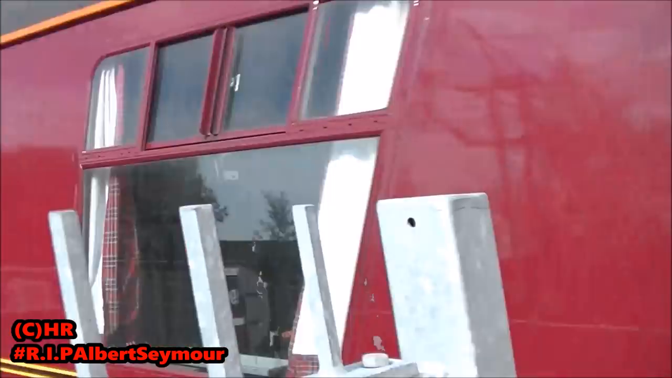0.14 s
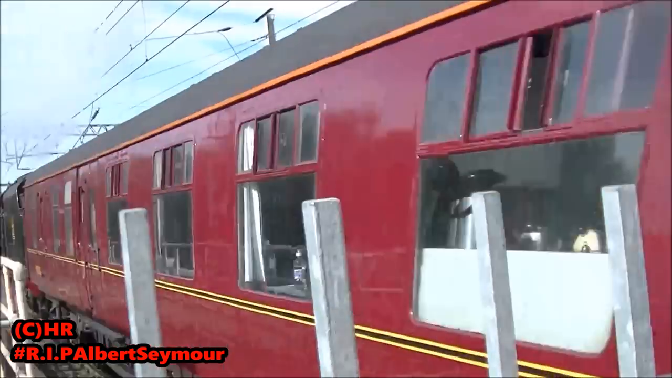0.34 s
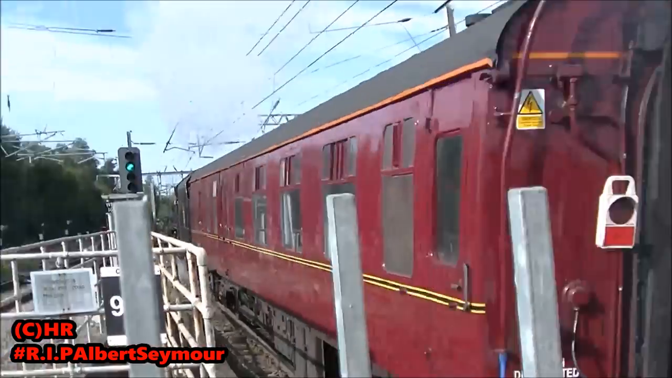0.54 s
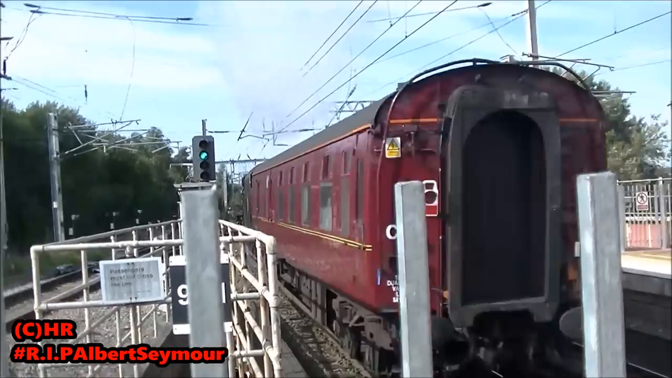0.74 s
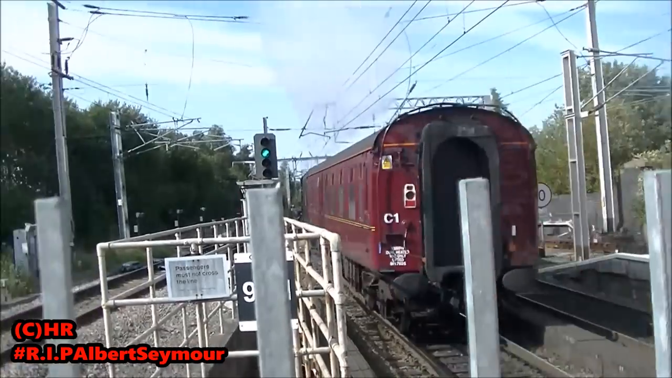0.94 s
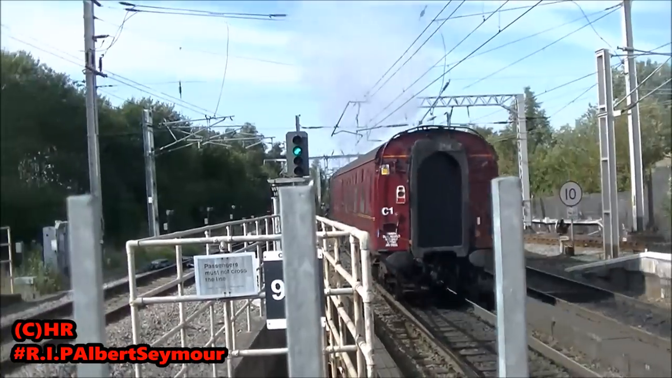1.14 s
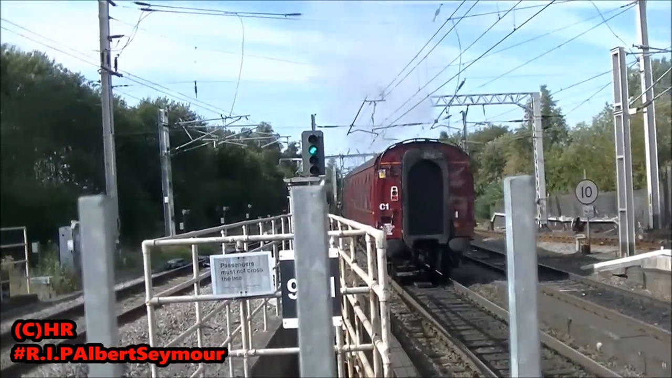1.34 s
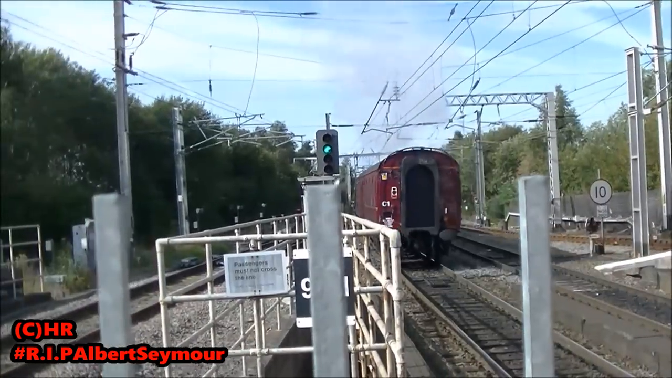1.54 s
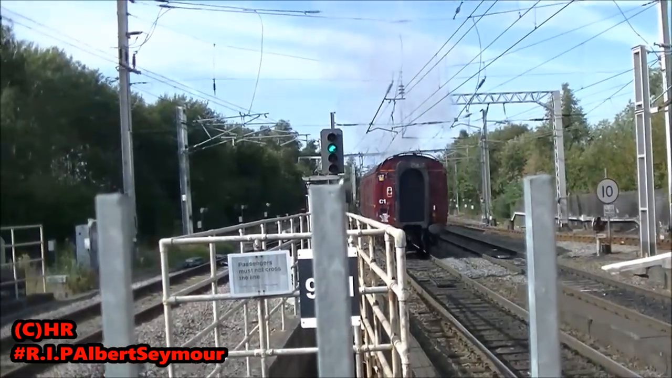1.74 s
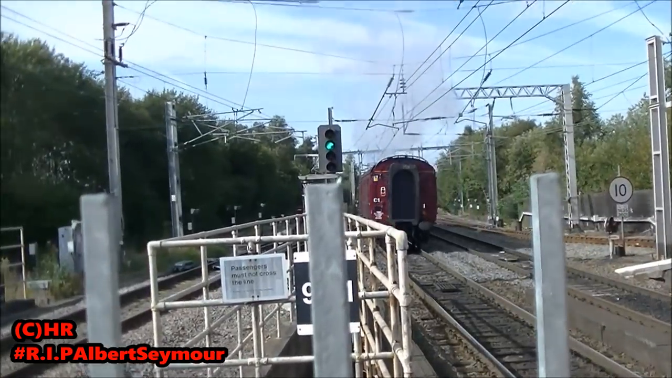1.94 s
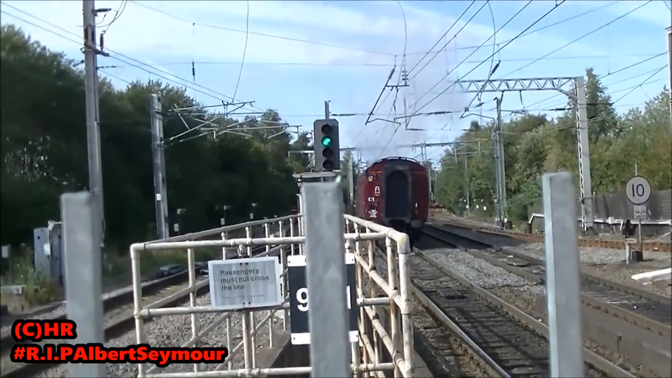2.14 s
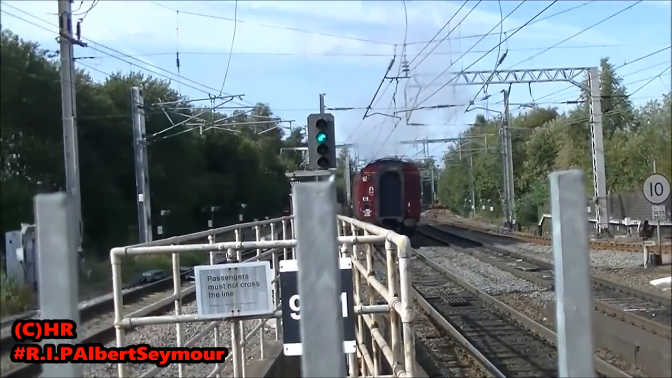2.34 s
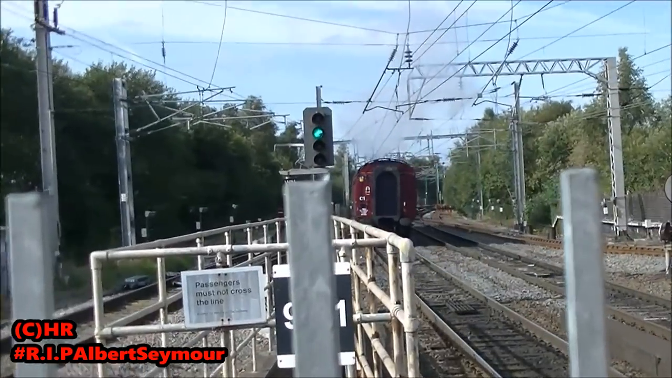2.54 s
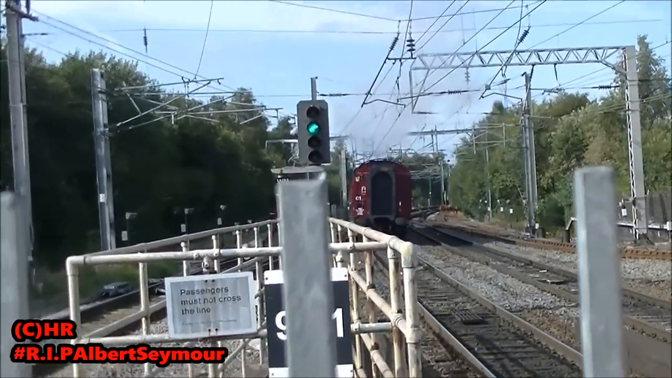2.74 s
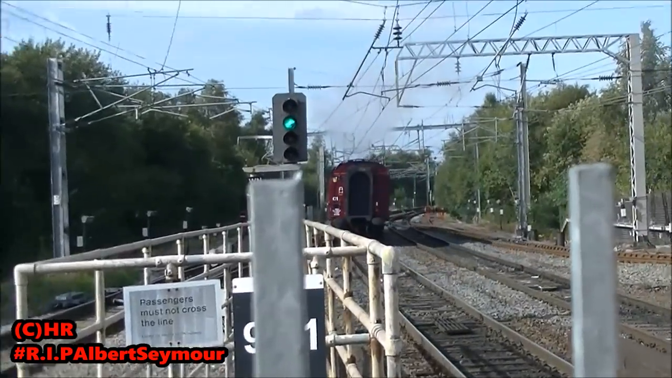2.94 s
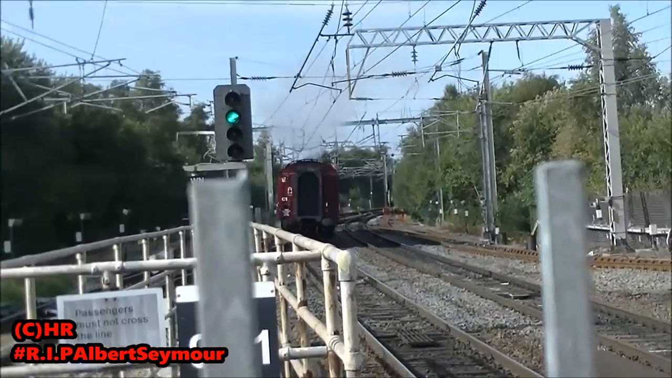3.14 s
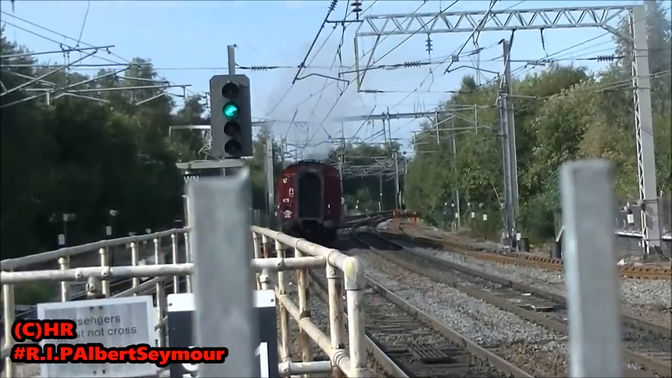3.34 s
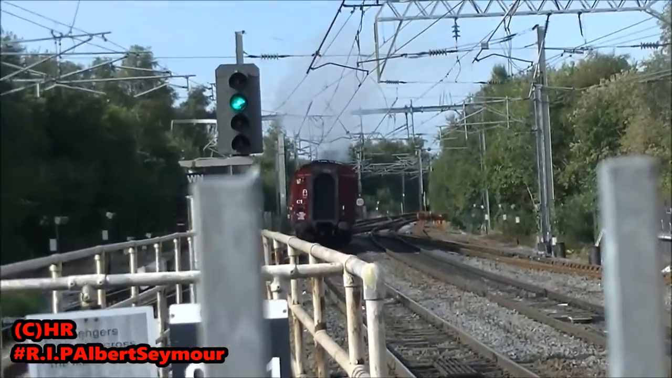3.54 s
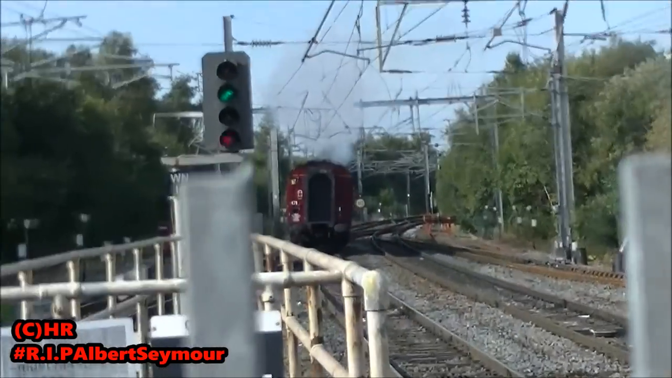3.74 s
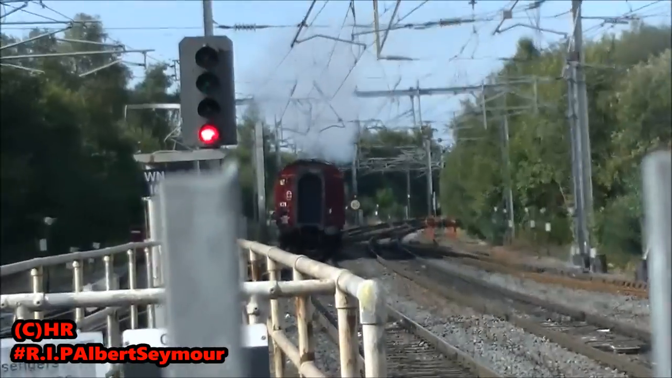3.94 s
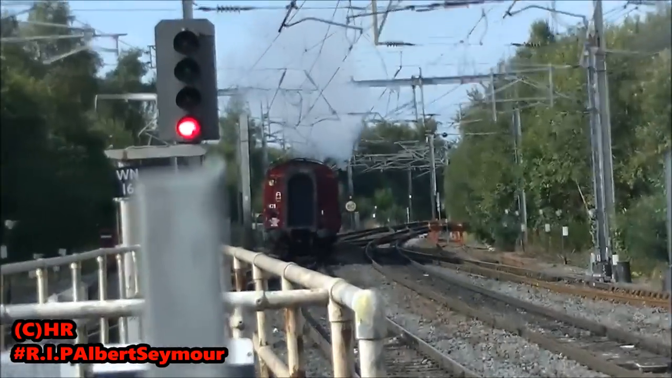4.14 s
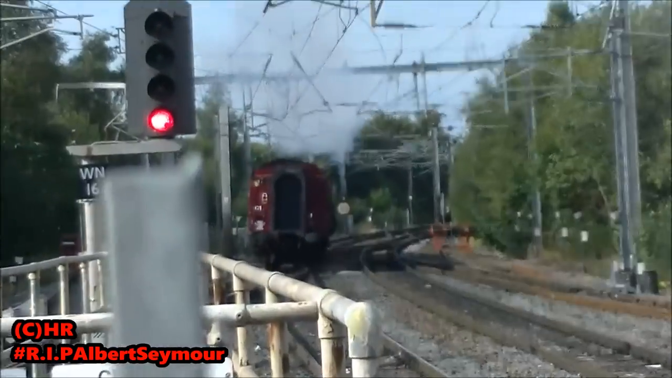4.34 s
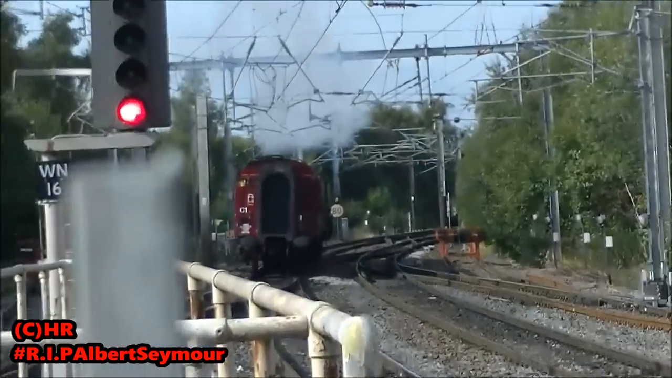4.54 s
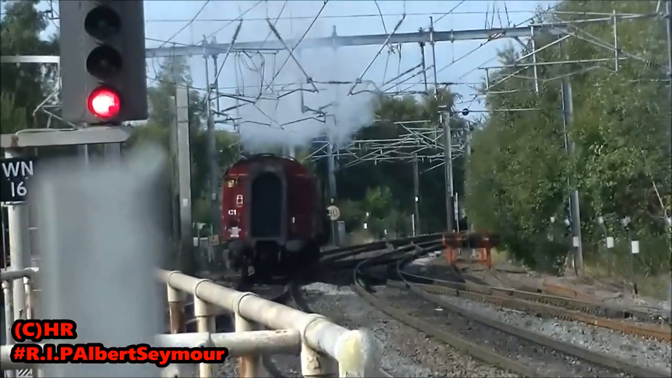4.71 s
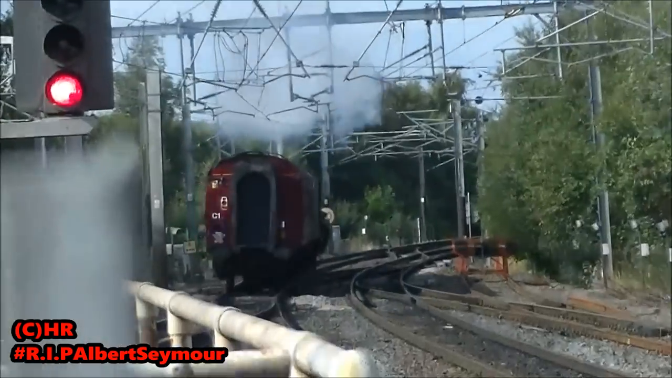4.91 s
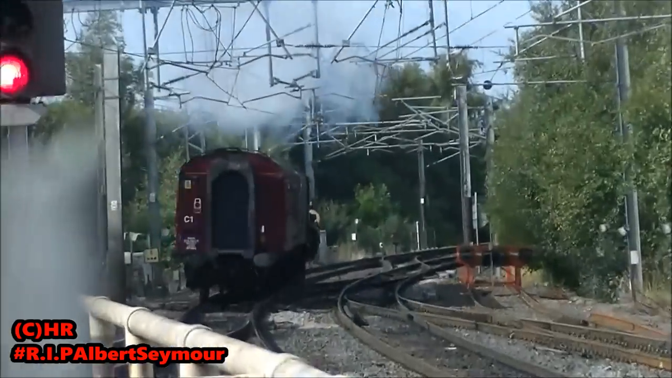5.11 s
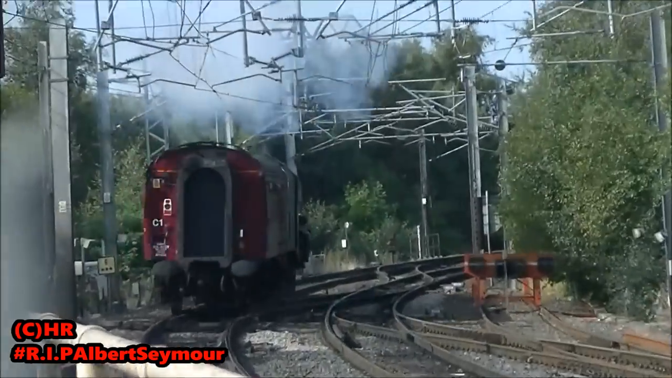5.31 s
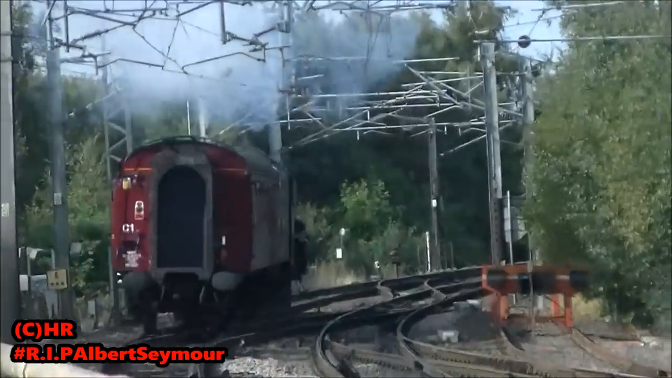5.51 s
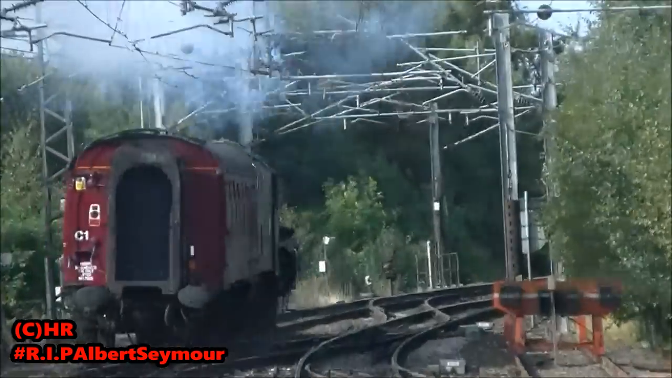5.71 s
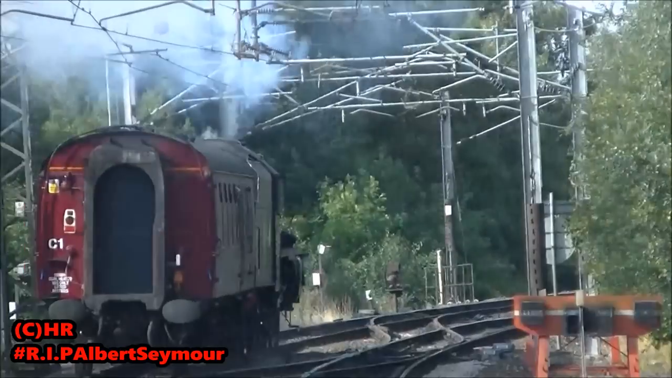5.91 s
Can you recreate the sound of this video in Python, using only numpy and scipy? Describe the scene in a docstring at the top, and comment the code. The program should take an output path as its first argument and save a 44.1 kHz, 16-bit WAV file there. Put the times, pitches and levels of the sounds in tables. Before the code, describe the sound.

Outdoors on a station platform, a microphone close to the track catches the end of a passing train: dense steel roar, hiss and metallic ringing falling in pitch. Regular wheel scuffs follow as it fades over a few seconds. Hard clicks snap close to the microphone, the track hums hollowly, wheels knock over points, and thin, high squeals come from the curve.

```python
"""The last coach of a steam train rushes past the platform: rail roar, wheel hiss and ringing that drops in pitch.
A wheel scuffs about once a turn, slipstream buffets the microphone, and dry clicks and rattles sound nearby.
As the train rolls away the track hums, wheels knock over points, and flanges squeal in the far curve.
Rolling is coloured stereo noise; ringing is noisy modes; clicks are decaying sines; rattles are random ticks."""
import sys
import numpy as np
from scipy import signal
from scipy.fft import rfft, irfft, next_fast_len
from scipy.io import wavfile
from scipy.ndimage import uniform_filter1d

SR = 44100
rng = np.random.default_rng(int(sys.argv[2]) if len(sys.argv) > 2 else 0)


def unload_wav(signal):
    """Save mono or channel-first audio to the path in sys.argv[1] as 16-bit WAV at rate SR, clipped to [-1, 1]."""
    wavfile.write(
        sys.argv[1],
        SR,
        np.round(np.clip(np.atleast_2d(signal).T, -1, 1) * 32767).astype(np.int16),
    )


N = 263277
TIME_S = np.arange(N) / SR

# Colour of each rolling part, train close and far: (frequency [Hz], relative density [dB per Hz])
RUMBLE_NEAR = [(25, -50), (70, -48), (110, -39), (150, -21.5), (200, -10), (260, -2.5), (330, -6),
               (400, -0.5), (520, -48), (880, -120)]
RUMBLE_FAR = [(25, -57), (70, -54), (110, -42), (150, -25.5), (195, -10), (280, 1), (350, 2.5), (400, -6),
              (520, -37), (880, -120)]
RAIL_NEAR = [(190, -55), (330, -17), (451, -4.5), (593, -1), (1080, -1), (1400, -18), (2380, -120)]
RAIL_FAR = [(190, -48), (330, -20), (503, -9), (578, -2), (638, -1), (705, 0), (877, -9.5), (1080, -19),
            (1400, -32), (2380, -120)]
WHEEL_NEAR = [(560, -49.5), (950, -3), (1180, -2.5), (1320, 4), (1580, -2), (1770, 0), (2100, -2),
              (2470, 0.5), (3000, -6.5), (3900, -27), (6600, -120)]
WHEEL_FAR = [(560, -56), (950, -5), (1050, -3.5), (1190, 0), (1280, -3), (1420, -6.5), (1640, 1.5),
             (1840, 3), (2280, -1.5), (2700, -5.5), (3000, -9), (3900, -24), (6600, -120)]
HISS_NEAR = [(1590, -44), (2700, 0.5), (3180, 0), (4890, -3), (5690, -7.5), (6730, -12), (7600, -32.5),
             (9880, -54), (16700, -120)]
HISS_FAR = [(1590, -34), (2700, 2), (3110, -10.5), (3320, 2), (3580, 2.5), (4110, 3.5), (4930, 3),
            (5560, -8), (6230, -20), (7090, -16), (7600, -21), (9880, -42), (16700, -120)]
FIZZ_NEAR = [(4240, -35), (7200, 1.5), (8200, -1), (9400, 1.5), (10400, 0.5), (11300, -6.5), (12200, -13),
             (13300, -19), (15500, -33)]
FIZZ_FAR = [(4240, -32), (7200, -8), (8340, -7.5), (8900, -6), (10100, -0.5), (11500, -8.5), (13000, -9),
            (15300, -11), (16000, -20)]

# Train position: (time [s], distance [0 close - 1 far], share of BALANCE [1], stereo width [1])
PATH = [(0, 0.1, 0.45, 1.04), (1.0, 0.15, 0.53, 0.84), (1.8, 0.42, 0.37, 1.08), (2.6, 0.4, 0.42, 1.2),
        (4.2, 0.56, 0.5, 0.94), (5.97, 0.69, 0.31, 0.65)]
# Left-right level difference at full share: (frequency [Hz], difference [dB])
BALANCE = [(60, -4), (110, 3), (200, -13), (380, -12.5), (700, -8.5), (1290, -6), (2380, -1.5), (4400, 0),
           (8120, -2), (15000, -5)]
# Likeness of the ports at width 1: (frequency [Hz], correlation [0-1])
LIKENESS = [(60, .7), (130, .76), (290, .8), (640, .94), (1300, .9), (1900, .94), (2700, .92), (4000, .965),
            (6400, .91), (8000, .975), (15000, .99)]
# Phase by which the left port leads at width 1: (frequency [Hz], phase [rad])
LEAD = [(20, 0), (110, .2), (260, .4), (780, .3), (3200, .3), (5000, .22), (6600, .05), (9000, 0)]

# Rolling loudness, drives all steady parts but the rumble: (time [s], level [dB])
LOUDNESS = [(0, -20.5), (.44, -19), (.56, -22), (1.0, -20.5), (1.5, -22.5), (1.92, -26), (2.7, -29),
            (3.4, -33), (4.2, -35.5), (5.4, -34.5), (5.97, -32.5)]
# Low rumble, which carries further: (time [s], level [dB])
RUMBLE_LEVEL = [(0, -38.5), (.6, -41.5), (1.2, -43.5), (1.7, -45), (2.4, -45.3), (3.4, -46.8), (4.2, -49.7),
                (5.97, -49)]
# Rail roar on rough stretches of track: (start [s], peak level [dB], length [s])
SURGES = [(.215, -27, 0.055), (.62, -21, 0.068), (.765, -20.5, 0.071), (1.25, -26, 0.11),
          (1.42, -29, 0.058), (1.74, -25, 0.058)]
# Wheels knocking over the points: (start [s], peak level [dB], length [s])
KNOCKS = [(3.555, -32, .04), (4.33, -45, 0.037), (4.44, -36, 0.1), (4.555, -33, .04), (5.021, -31, 0.018),
          (5.26, -34, 0.06)]
# Wheel and rail modes of the passing bogie: (pitch before Doppler [Hz], loudest at [s], level [dB],
# rise [dB/s], fade [dB/s], steadiness [0-1])
BOGIE_MODES = [(900, .075, -23.5, 250, 250, .7), (640, .135, -25, 250, 250, .6),
               (1370, 0.16, -25, 200, 300, .75), (677, 0.246, -21.5, 400, 400, 0.8),
               (1398, .275, -23, 350, 400, .8), (1370, .37, -20, 280, 220, 0.93),
               (1366, 0.443, -23, 250, 280, .87), (755, 0.457, -23, 300, 300, 0.5),
               (626, 0.67, -21, 280, 153, .6), (638, .735, -28, 250, 250, 0.4),
               (693, .785, -24.5, 450, 450, .6), (636, .99, -24.5, 402, 400, 0.8),
               (579, 1.28, -22.5, 190, 220, 0.75), (736, 1.5, -25, 300, 300, 0.7),
               (649, 1.43, -23, 190, 170, .75), (950, 1.445, -27.5, 450, 449, .5),
               (1470, .81, -25.5, 250, 200, 0.7), (1359, 0.854, -24, 250, 250, 0.5),
               (1530, .945, -28, 200, 300, .6), (1440, 1.11, -31, 200, 200, 0.5),
               (1378, 0.73, -29.5, 29, 8, 0.08), (518.5, 0.78, -29.5, 60, 41, 0.2),
               (480, 1.29, -29, 43, 110, .3)]

# Wheel scuffs: (start [s], peak level [dB], length [s])
SCUFFS = [(.335, -20, 0.046), (.945, -23.5, 0.037), (1.218, -25, 0.05), (1.486, -23.5, 0.036),
          (1.756, -22.5, 0.048), (2.03, -22.5, 0.057), (2.298, -22.5, .035), (2.566, -24.5, 0.035)]
# Scuff colour: (frequency [Hz], relative density [dB])
SCUFF_COLOUR = [(900, -40), (2000, 2), (3300, -2.5), (4200, 4), (5200, -2), (6200, -17), (8000, -25.5),
                (10500, -35), (15000, -51)]
# Slipstream gusts: (start [s], peak level [dB], length [s])
GUSTS = [(.465, -38.5, 0.095), (.51, -45, 0.15), (1.31, -48, 0.1), (1.56, -59, 0.055), (2.02, -52, 0.22),
         (2.31, -58, .08)]
# Gust colour: (frequency [Hz], relative density [dB])
GUST_COLOUR = [(25, -30), (60, -27), (110, -8), (170, 2.5), (260, 0.5), (500, -18), (1500, -70)]

# Dry clicks, before the high-pass: (time [s], level [dB], starting pitch [Hz], T60 [s], rebound level [dB],
# upper modes' level [dB], body level [dB]); rebound is relative to the strike, body to the snap
CLICKS = [(.487, -24, 9500, .004, -6, 8, -10), (0.5362, -11, 8300, 0.0033, 1, 7.5, -12),
          (1.823, -17.5, 8800, 0.0018, -12, 10, -15), (2.907, 4, 6970, 0.0054, -7, 0.5, -10.5),
          (3.5812, -17.5, 8500, 0.0025, -6, 5, -12), (5.8367, 6, 5900, 0.0032, -9.5, -5, -10),
          (5.8528, -22, 9600, 0.0066, -8, 10, -10), (5.854, -17, 6100, 0.013, -10, -10, -12),
          (5.889, -28, 9000, 0.0044, -8, 8, -10), (5.8892, -25, 4930, .012, -8, -15, 5)]
# Upper modes of every click: (frequency [Hz], relative level [dB], T60 [s])
CLICK_MODES = [(8460, -13, 0.0052), (9750, -10.5, 0.0051), (12800, -20, 0.0043)]
# Brief level dips: (centre [s], depth [dB], length [s])
DIPS = [(0.528, 1.5, 0.048), (1.378, 5, 0.041), (1.884, 0.5, 0.067), (2.947, 2, 0.12)]
# Gritty rattles: (start [s], peak level [dB], length [s])
RATTLES = [(1.342, -37, .014), (1.553, -42, .03), (1.576, -39, .04), (2.035, -48, .07), (2.168, -48, .03)]
# Rattle colour: (frequency [Hz], relative density [dB])
GRIT_COLOUR = [(3000, -30), (6000, 1), (8500, 0), (11000, 0), (13000, -8), (15500, -18)]
# Track hum behind the train: (loudest at [s], level [dB], length [s], frequency [Hz], width [Hz])
DRONES = [(2.95, -37.5, 2.3, 696, 18), (2.7, -39.5, 2.0, 590, 50), (2.7, -37.5, 1.0, 770, 80),
          (3.22, -33.5, .32, 720, 130), (3.19, -34.5, .32, 1080, 260)]
LOW_HZ, SIDE_HZ, MAIN_HZ, UPPER_HZ, TOP_HZ = 4762, 4790, 4897, 5262, 6565  # wheel modes that squeal
# Flange squeals: (start [s], held length [s], level [dB], starting pitch [Hz], glide [Hz/s], steadiness [0-1])
SQUEALS = [(4.405, .085, -50, TOP_HZ, 600, 0.9), (4.505, .06, -48.5, TOP_HZ + 65, 400, .9),
           (4.57, .06, -54, TOP_HZ + 55, 700, .8), (4.66, .065, -36.5, MAIN_HZ, 0, .95),
           (4.738, .1, -36.5, MAIN_HZ, 0, .9), (4.857, 0.047, -38, MAIN_HZ, -150, .95),
           (4.94, .125, -41, MAIN_HZ, 0, .8), (5.12, .07, -42, MAIN_HZ, 0, .9),
           (5.217, 0.07, -36, MAIN_HZ, 0, 0.84), (5.291, .16, -42, MAIN_HZ, -200, 0.7),
           (5.47, 0.18, -39.5, MAIN_HZ, -64, 0.7), (5.636, 0.037, -31.5, MAIN_HZ, -500, 0.95),
           (5.722, .075, -35, MAIN_HZ, 0, .85), (5.87, .04, -39, MAIN_HZ, -300, .7),
           (4.645, .07, -48, UPPER_HZ, 0, .85), (4.75, .135, -44.5, UPPER_HZ, 0, .85),
           (4.93, .135, -41, UPPER_HZ, -40, .92), (5.075, .13, -44, UPPER_HZ, 0, .85),
           (5.254, 0.12, -44, UPPER_HZ, 0, .85), (5.397, .3, -51, UPPER_HZ, 0, .6),
           (4.885, .18, -44, SIDE_HZ, 0, 0.9), (5.679, 0.11, -40, LOW_HZ, -60, .85),
           (5.868, .075, -38, LOW_HZ, -80, .9)]

CLOSE_DB = -21  # LOUDNESS at which the steady parts have the levels below
# FADE: dB of change per dB of LOUDNESS
RAIL_DB, RAIL_FADE, RAIL_LURCH_DB = -21.5, 0.98, 1.0
WHEEL_DB, WHEEL_FADE = -22, 0.95
HISS_DB, HISS_FADE = -23.5, 0.91
FIZZ_DB, FIZZ_FADE = -42, 1.49
PASS_S, PASS_WIDTH_S, DOPPLER = 0.26, 0.1523, 0.063  # DOPPLER: share of pitch, either way
BOGIE_WIDTH_HZ = 50
CLICK_LOW_HZ = 1300
SCATTER_DB, SCATTER_T60_S = -33, 0.012
GRIT_PER_S = 1500
SQUEAL_RISE_S, SQUEAL_RING_S = 0.02, 0.2  # ring: time to fall 60 dB
SQUEAL_WAVER_HZ, SQUEAL_FLUTTER_DB = 6, 1
FLOOR_DB, EDGE_HZ = -69, 15900


def gain_of(db):
    """Decibels to amplitude."""
    return 10 ** (np.asarray(db) / 20)


def evened(x):
    """Scales to an rms of 1."""
    return x / np.sqrt(np.mean(abs(x) ** 2) + 1e-20)


def read(points, hz):
    """Reads a spectrum on a log-frequency axis."""
    f, value = np.transpose(points)
    return np.interp(np.log(hz + 1), np.log(f + 1), value)


def follow(rows, t_s):
    """Reads every column of a curve at the times t_s."""
    s, *columns = np.transpose(rows)
    return [np.interp(t_s, s, c) for c in columns]


def add(mix, s, sound):
    """Adds a sound to the mix at time s."""
    part = mix[round(s * SR):][:len(sound)]
    part += sound[:len(part)]


def coloured(x, colour_points):
    """Filters noise to a colour, at an rms of 1."""
    colour = gain_of(read(colour_points, np.fft.rfftfreq(N, 1 / SR)))
    return evened(irfft(rfft(x) * colour, N))


def wander(rate_hz, size=N):
    """Slow random drift: Gaussian low-passed noise of rms 1 before trimming."""
    padded = next_fast_len(max(size, SR), True)
    hz = np.fft.rfftfreq(padded, 1 / SR)
    spectrum = rfft(rng.standard_normal(padded)) * np.exp(-(hz / rate_hz) ** 2)
    return evened(irfft(spectrum, padded))[:size]


def panned(x, left_db):
    """Places a sound between the ports by level difference."""
    return x * gain_of([[left_db / 2], [-left_db / 2]])


def swells(rows):
    """Envelope of bursts that rise quickly, peak at a quarter length and die away."""
    s, db, length_s = np.transpose(rows)[:, :, None]
    u = np.maximum(TIME_S - s, 0) * 4 / length_s
    return (gain_of(db) * u * np.exp(1 - u)).sum(0)


def bell(centre_s, length_s):
    """Gaussian bump in time."""
    return np.exp(-(2 * (TIME_S - centre_s) / length_s) ** 2)


def rush(near, far, patchy_db, size=1024):
    """Patchy noise at two microphone ports, its colour shifting as the train draws away."""
    hop = size // 4
    t_s = np.arange(N // hop + 5) * hop / SR
    hz = np.fft.rfftfreq(size, 1 / SR)
    distance, aside, width = (c[:, None] for c in follow(PATH, t_s))
    distance = np.clip(distance, 0, 1)
    colour = gain_of((1 - distance) * read(near, hz) + distance * read(far, hz))
    colour /= np.linalg.norm(colour, axis=1, keepdims=True)

    a, b, c, d, patches = rng.standard_normal((5, len(t_s), len(hz)))
    patches = uniform_filter1d(patches, size=10, axis=0)
    patches = evened(uniform_filter1d(patches, size=8, axis=1))

    # the right port shares part of the left port's noise, delayed in phase
    same = np.clip(1 - width ** 2 * (1 - read(LIKENESS, hz)), 0, 1)
    left = a + 1j * b
    right = same * left + np.sqrt(1 - same ** 2) * (c + 1j * d)
    right = right * np.exp(-1j * width * read(LEAD, hz))
    lean = gain_of(aside * read(BALANCE, hz) / 2)
    z = np.array([left * lean, right / lean]) * colour * gain_of(patchy_db * patches)
    ports = signal.istft(z.swapaxes(1, 2), nperseg=size, noverlap=size - hop)[1][:, :N]
    return ports / ports.mean(0).std()


def ringing(hz, width_hz, steady):
    """One mode on a moving pitch: fuzzy when shaken by roughness, steadier when stick-slip locks on."""
    steady = np.clip(steady, 0, 1)
    shaken = (wander(width_hz, len(hz)) + 1j * wander(width_hz, len(hz))) / np.sqrt(2)
    swing = np.sqrt(steady) + np.sqrt(1 - steady) * shaken
    carrier = np.exp(2j * np.pi * np.cumsum(hz) / SR)
    return np.sqrt(2) * (swing * carrier).real


def rolling():
    """Rough steel on steel shakes sleepers, rails and wheels; rails lurch, upper parts share one flutter."""
    away_db = follow(LOUDNESS, TIME_S)[0] - CLOSE_DB
    flutter, lumps, lurch = wander(rate_hz=52), wander(rate_hz=20), wander(rate_hz=27)

    rumble_gain = gain_of(follow(RUMBLE_LEVEL, TIME_S)[0] + 0.9 * lumps)
    rail_gain = gain_of(RAIL_DB + RAIL_FADE * away_db + RAIL_LURCH_DB * lurch)
    wheel_gain = gain_of(WHEEL_DB + WHEEL_FADE * away_db + 0.7 * flutter)
    hiss_gain = gain_of(HISS_DB + HISS_FADE * away_db + 0.5 * flutter)
    fizz_gain = gain_of(FIZZ_DB + FIZZ_FADE * away_db + 0.94 * flutter)
    # surges and knocks add in power
    rail_gain = np.hypot(rail_gain, swells(SURGES))
    wheel_gain = np.hypot(wheel_gain, swells(KNOCKS))

    rumble = rumble_gain * rush(RUMBLE_NEAR, RUMBLE_FAR, patchy_db=0.0, size=2048)
    rails = rail_gain * rush(RAIL_NEAR, RAIL_FAR, patchy_db=1.0, size=2048)
    wheels = wheel_gain * rush(WHEEL_NEAR, WHEEL_FAR, patchy_db=1.05)
    hiss = hiss_gain * rush(HISS_NEAR, HISS_FAR, patchy_db=1.5)
    fizz = fizz_gain * rush(FIZZ_NEAR, FIZZ_FAR, patchy_db=1.0)
    return rumble + rails + wheels + hiss + fizz


def bogie():
    """Wheel and rail resonances ring up in rough pieces; one Doppler drop shifts all as the last bogie passes."""
    shift = 1 - DOPPLER * np.tanh((TIME_S - PASS_S) / PASS_WIDTH_S)
    out = np.zeros(N)
    for hz, s, db, rise, fade, steady in BOGIE_MODES:
        level_db = db - np.maximum(rise * (s - TIME_S), fade * (TIME_S - s))
        out += gain_of(level_db) * ringing(hz * shift, width_hz=BOGIE_WIDTH_HZ, steady=steady)
    return panned(out, left_db=-4.5)


def scuffs(knock_db=-2.0):
    """Short noise rasps about once a wheel turn, and with every knock on the points."""
    level = swells(SCUFFS) + gain_of(knock_db) * swells(KNOCKS)
    return level * rush(SCUFF_COLOUR, SCUFF_COLOUR, patchy_db=1.6)


def slipstream():
    """Eddies behind the last coach push on each port separately: independent low noise."""
    return swells(GUSTS) * coloured(rng.standard_normal((2, N)), GUST_COLOUR)


def clicks(rise_s=0.0001, sag=0.4, sag_s=0.0023, rebound_s=0.00124, rebound_pitch=0.683,
           body_pitch=0.466, port_lag_s=0.000007):
    """A small hard part snaps, pitch falling under fixed upper modes, restrikes lower and leaves a short spray."""
    out = np.zeros((2, N))
    sprays = rng.standard_normal((len(CLICKS), 1200))
    for port, lag_s in zip(out, [0, port_lag_s]):
        t = np.maximum(np.arange(sprays.shape[1]) / SR - lag_s, 0)
        onset = 1 - np.exp(-(t / rise_s) ** 2)
        # integral of a relative pitch that sinks from 1 towards 1 - sag
        sagging = t - sag * (t - sag_s * (1 - np.exp(-t / sag_s)))
        for (s, db, hz, t60_s, rebound_db, bright_db, body_db), spray in zip(CLICKS, sprays):
            phase = 2 * np.pi * hz * sagging
            decay = gain_of(-60 * t / t60_s)
            snap = decay * (np.sin(phase) + gain_of(body_db) * np.sin(body_pitch * phase))
            upper = sum(gain_of(level_db + bright_db - 60 * t / ring_s) * np.sin(2 * np.pi * f * t)
                        for f, level_db, ring_s in CLICK_MODES)
            scatter = gain_of(SCATTER_DB - 60 * t / SCATTER_T60_S) * evened(uniform_filter1d(spray, size=8))
            scatter = scatter * np.sin(2 * np.pi * hz * t)
            rebound = decay * np.sin(rebound_pitch * phase)
            add(port, s, gain_of(db) * onset * (snap + upper + scatter))
            add(port, s + rebound_s, gain_of(db + rebound_db) * onset * rebound)
    highpass = signal.butter(2, CLICK_LOW_HZ, "highpass", fs=SR, output="sos")
    return signal.sosfilt(highpass, out)


def dips():
    """Gain that sinks for a moment and comes back."""
    return gain_of(-sum(depth_db * bell(s, length_s) for s, depth_db, length_s in DIPS))


def grit():
    """Brief bright rattles, each a cloud of tiny random ticks of uneven size."""
    ticks = (rng.random(N) < GRIT_PER_S / SR) * rng.standard_normal(N)
    return swells(RATTLES) * coloured(ticks, GRIT_COLOUR)


def drone():
    """Behind the departing train the track hums on in a few hollow noise-driven resonances."""
    out = np.zeros(N)
    for s, db, length_s, hz, width_hz in DRONES:
        out += gain_of(db) * bell(s, length_s) * ringing(np.full(N, hz), width_hz=width_hz, steady=0)
    return panned(out, left_db=-4.5)


def flanges():
    """Stick-slip squeals catch, hold and ring on into one another as the wheels take the curve."""
    out = np.zeros(N)
    waver_hz = SQUEAL_WAVER_HZ * wander(rate_hz=30)
    flutter_db = SQUEAL_FLUTTER_DB * wander(rate_hz=40)
    for s, length_s, db, hz, glide, steady in SQUEALS:
        on = (TIME_S > s) & (TIME_S < s + length_s + SQUEAL_RING_S)
        t = TIME_S[on] - s
        release = gain_of(-60 * np.maximum(t - length_s, 0) / SQUEAL_RING_S)
        grip = np.minimum(t / SQUEAL_RISE_S, 1) * release
        tone = ringing(hz + waver_hz[on] + glide * t, width_hz=40, steady=steady)
        out[on] += gain_of(db + flutter_db[on]) * grip * tone
    return panned(out, left_db=-1)


def scene():
    """The train with its dips, then flanges, slipstream, rattles and clicks, which do not dip."""
    train = dips() * (rolling() + bogie() + scuffs() + drone())
    return train + slipstream() + clicks() + grit() + flanges()


def record(dry):
    """Adds a faint hiss, alike in both channels; clips at full scale; low-passes."""
    clipped = np.clip(dry + gain_of(FLOOR_DB) * rng.standard_normal(N), -1, 1)
    lowpass = signal.firwin(511, EDGE_HZ, window=("kaiser", 9), fs=SR)
    return signal.oaconvolve(clipped, lowpass[None], "same")


dry = scene()
out = record(dry)
unload_wav(out)
```